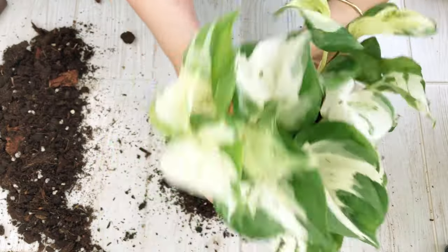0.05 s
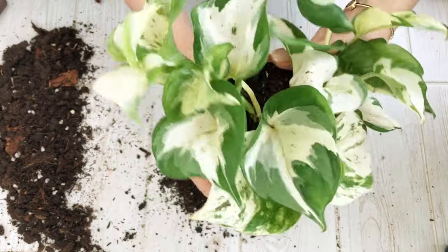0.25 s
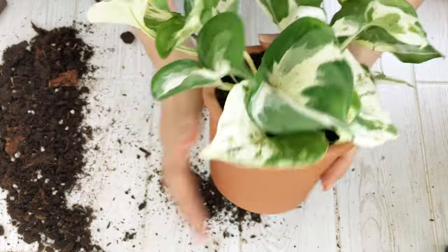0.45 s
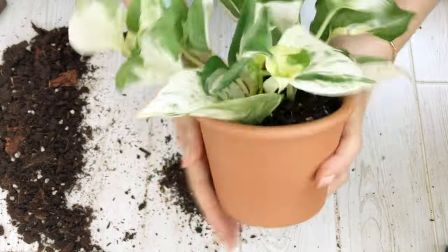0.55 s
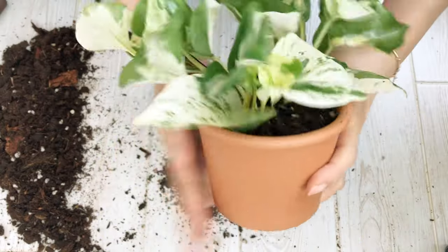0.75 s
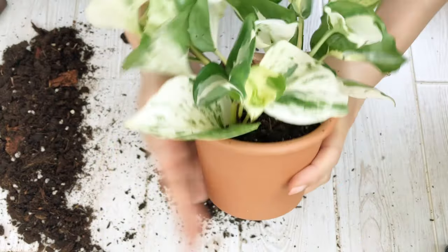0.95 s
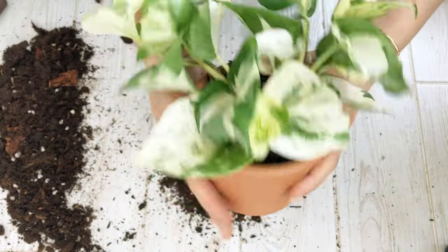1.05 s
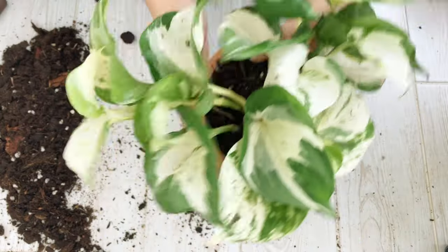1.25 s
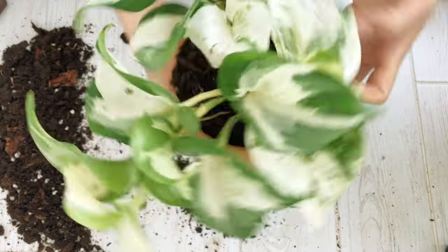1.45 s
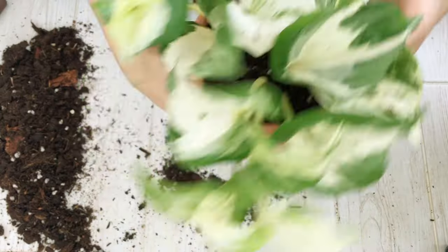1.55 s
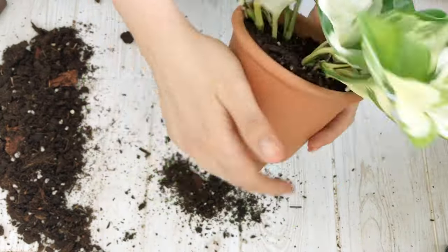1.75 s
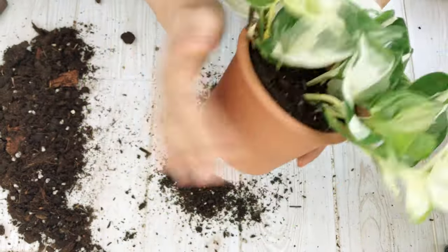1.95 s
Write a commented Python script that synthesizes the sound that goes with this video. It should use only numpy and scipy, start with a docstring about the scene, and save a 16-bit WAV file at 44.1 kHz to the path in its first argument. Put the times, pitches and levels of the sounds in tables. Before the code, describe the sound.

A hand pats a soil-filled clay plant pot in quick, gritty slaps indoors.

```python
"""A hand pats a soil-filled clay pot in a small room: six quick pats, a soft touch, then two more as
the pot is tilted. Each is a gritty slap with a short, damped ring of the clay. Before them the moving
pot gives a deep double bump; later it rumbles in the hands and the palm scrapes it once.
Leaves rustle faintly and a few thin chirps sit in the rumble, hum and hiss of the room."""
import sys
import numpy as np
from scipy import signal
from scipy.fft import rfft, irfft
from scipy.io import wavfile

SR = 44100
rng = np.random.default_rng(int(sys.argv[2]) if len(sys.argv) > 2 else 0)


def put_to_file(sound):
    """Save the sound as 16-bit audio at rate SR, in the file named by the first command-line argument."""
    columns = np.atleast_2d(sound).T  # one column per channel
    safe = np.clip(columns, -1, 1)
    whole_steps = np.round(safe * 32767)
    wavfile.write(sys.argv[1], SR, whole_steps.astype(np.int16))


N = 88200


def undb(db):
    """Decibels to gain."""
    return 10 ** (np.asarray(db) / 20)


def unit(x):
    """Scale to rms 1."""
    return x / np.sqrt(np.mean(x ** 2) + 1e-30)


def unit_energy(x):
    """Scale to energy 1."""
    return x / np.linalg.norm(x)


def clock():
    """Sample times in seconds."""
    return np.arange(N) / SR


def fade(t, t60_s):
    """Exponential decay from t = 0, silent before."""
    return (t >= 0) * np.exp(-np.log(1000) * np.maximum(t, 0) / t60_s)


def swell(middle_s, sigma_s):
    """Gaussian rise and fall."""
    return np.exp(-.5 * ((clock() - middle_s) / sigma_s) ** 2)


def colour(x, spectrum):
    """Filter by a curve of (Hz, dB) points."""
    hz, db = np.array(spectrum, float).T
    bins_hz = np.maximum(np.fft.rfftfreq(len(x), 1 / SR), 1)
    gain = undb(np.interp(np.log(bins_hz), np.log(hz), db))
    return irfft(rfft(x) * gain, len(x))


def band(x, hz, kind):
    """Causal low-, band- or high-pass."""
    return signal.sosfilt(signal.butter(3, hz, kind, fs=SR, output="sos"), x)


def noise(spectrum):
    """Coloured noise of rms 1."""
    return unit(colour(rng.standard_normal(N), spectrum))


def band_noise(hz, kind):
    """Band-limited noise of rms 1."""
    return unit(band(rng.standard_normal(N), hz, kind))


def grit(count, spread_db):
    """Dense tiny clicks of uneven size."""
    return rng.standard_normal(count) * undb(spread_db * rng.standard_normal(count))


# Room noise spectra. Each row: frequency in Hz, relative level in dB.
RUMBLE_SPECTRUM = [(12, -0.5), (25, -9.5), (38, 2.5), (55, 1.5), (70, -15.5), (88, -6), (120, -23.5),
                   (150, -15.5), (200, -22), (260, -25), (340, -35), (600, -66.5)]
HISS_SPECTRUM = [(100, 7.5), (430, 5.5), (510, 4.5), (610, 12.5), (800, 3), (1000, 1), (1450, 3),
                 (2200, -0.5), (4000, -5), (5300, -4), (8000, -6.5), (12000, -7.5), (16000, -14.5)]

def room_noise(rumble_db=-39, hiss_db=-56.5):
    """Steady low rumble and a soft hiss that wavers a little."""
    waver_db = 0.45 * band_noise(17, "low")
    return undb(rumble_db) * noise(RUMBLE_SPECTRUM) + undb(hiss_db + waver_db) * noise(HISS_SPECTRUM)


# Low tones of the room. Each row: frequency in Hz, level in dB.
HUM_TONES = [(88, -52), (117, -53), (184, -64.5), (259, -66.5)]

def room_hum(half_width_hz=3.57):
    """Narrow noise bands, heard as tones that swell and fade."""
    return sum(undb(db) * band_noise([hz - half_width_hz, hz + half_width_hz], "band")
               for hz, db in HUM_TONES)


# Hands and leaves brushing the clay. Each row: middle in seconds, sigma in seconds, level in dB.
RUSTLES = [(0.04, 0.062, -56), (0.227, 0.011, -57), (0.311, 0.041, -55.5), (0.44, 0.021, -57.5),
           (1.222, 0.019, -59.5), (1.37, 0.066, -59), (1.59, 0.028, -58), (1.65, 0.0078, -57),
           (1.73, 0.021, -54), (1.792, 0.022, -56)]
# Rustle spectrum. Each row: frequency in Hz, relative level in dB.
LEAF_SPECTRUM = [(300, 11.5), (700, 7.5), (1500, 4), (3000, 5), (5000, 2), (7000, -3), (9100, 1),
                 (11000, -8), (12900, -2), (13600, 1), (16000, 6.5)]
# Rubbed clay resonances. Each row: frequency in Hz, width in Hz, level in dB re the rub.
RUBBED_MODES = [(4870, 90, -22), (9120, 490, -12.5), (12700, 360, -11)]

def leaves():
    """Fine-grained rustle of hands and swinging plant; the rubbing sets the clay singing faintly."""
    motion = sum(undb(db) * swell(middle_s, sigma_s) for middle_s, sigma_s, db in RUSTLES)
    rub = unit(colour(grit(N, spread_db=4), LEAF_SPECTRUM))
    clay = 0
    for hz, width_hz, db in RUBBED_MODES:
        resonator = signal.iirpeak(hz, hz / width_hz, fs=SR)
        clay += undb(db) * unit(signal.lfilter(*resonator, rub))
    return motion * unit(rub + clay)


# Thin chirps. Each row: middle in seconds, sigma in seconds, pitch in Hz, level in dB,
# wobble as a share of pitch.
CHIRPS = [(0.201, 0.017, 3060, -59.5, .02), (0.386, 0.024, 3210, -63.5, .022),
          (0.435, 0.015, 3064, -58.5, .015), (0.776, .011, 3090, -61, 0.011),
          (1.123, 0.017, 3170, -65.5, 0.016), (1.325, 0.016, 2710, -61.5, 0.0061),
          (1.368, 0.012, 2450, -64, .009)]

def chirps(wobble_hz=300, flutter_hz=110, flutter_db=3):
    """Faint whistles, unsteady in pitch and level."""
    out = 0
    for middle_s, sigma_s, hz, db, wobble in CHIRPS:
        pitch_hz = hz * (1 + wobble * band_noise(wobble_hz, "low"))
        flutter = undb(flutter_db * band_noise(flutter_hz, "low"))
        whistle = np.sin(2 * np.pi * np.cumsum(pitch_hz) / SR)
        out += undb(db) * swell(middle_s, sigma_s) * unit(flutter * whistle)
    return out


# Bumps of the moving pot. Each row: start in seconds, gain in dB, rise in seconds.
BUMPS = [(0.229, 1, .016), (0.32, -6, 0.017)]
# Low modes they ring. Each row: frequency in Hz, relative level in dB, T60 in seconds.
BUMP_MODES = [(36.15, -8.5, 0.33), (50.1, -15, 0.29), (89.3, -28, 0.476), (115.9, -33.5, 0.63)]
# Shudder spectrum. Each row: frequency in Hz, relative level in dB.
SHUDDER_SPECTRUM = [(20, -9), (55, 16.5), (90, 5), (140, 2.5), (200, -13.5), (330, -18.5), (600, -50)]

def bumps(shudder_db=-30):
    """A soft, deep bump and a weaker one as the pot settles: low modes and a shudder that die away."""
    out = 0
    for start_s, bump_db, rise_s in BUMPS:
        t = np.maximum(clock() - start_s, 0)
        swing = sum(undb(db) * np.sin(2 * np.pi * hz * t) * fade(t, t60_s)
                    for hz, db, t60_s in BUMP_MODES)
        shudder = undb(shudder_db) * noise(SHUDDER_SPECTRUM) * fade(t, t60_s=0.69)
        out += undb(bump_db) * (swing + shudder) * (1 - np.exp(-t / rise_s))
    return out


def slap(t, contact_s, crack_s, crack_db):
    """Gritty hand contact with one sharp fingertip crack, at unit energy."""
    rise_s = 0.93 * contact_s
    contact = grit(len(t), spread_db=6.5) * (1 - np.exp(-t / rise_s)) * np.exp(-t / contact_s)
    crack = undb(crack_db) * signal.unit_impulse(len(t), int(crack_s * SR))
    return unit_energy(unit_energy(contact) + crack)


def ring(t, hz, t60_s):
    """One struck mode of unit energy."""
    return unit_energy(np.sin(2 * np.pi * hz * t) * fade(t, t60_s))


# Clay wall modes. Each row: frequency in Hz, relative energy in dB, T60 in seconds.
CLAY_MODES = [(730, 11.5, 0.049), (863, 3.5, 0.07), (1445, 7.5, 0.04), (1970, 7.5, 0.065), (2470, 1, 0.036),
              (3280, -11, 0.011), (4540, -13, 0.12), (5690, 9, 0.014), (5900, 3, 0.068), (7300, -8, 0.042),
              (9020, 8, 0.047), (12470, 12.5, 0.041)]

def clay_ring(t, detune=0.004):
    """The wall rings, damped by soil and hand, slightly detuned on each pat."""
    return unit_energy(sum(undb(db) * ring(t, hz * (1 + detune * rng.standard_normal()), t60_s)
                           for hz, db, t60_s in CLAY_MODES))


def echoes(t, t60_s, delay_s=0.0027):
    """Diffuse reflections of unit energy."""
    return unit_energy(rng.standard_normal(len(t)) * fade(t - delay_s, t60_s))


def wall_echoes(t, split_hz=6040):
    """Room tail; the walls absorb the treble sooner."""
    return band(echoes(t, t60_s=0.2), split_hz, "low") + band(echoes(t, t60_s=0.18), split_hz, "high")


# Hand pats. Each row: start in seconds; thud, hollow, middle and treble band levels in dB; contact decay
# in seconds; crack delay in seconds, gain in dB; then the struck spot's modes: knock in Hz, gain in dB;
# ring in Hz, gain in dB, T60 in seconds; tick in Hz, gain in dB.
PATS = [(0.5461, -64, -54.5, -54.5, -59, 0.0045, 0.0025, -24, 734, -15, 1296, -3, 0.054, 4850, -13),
        (0.642, -56.5, -48, -47, -40, 0.0014, 0.00034, -4, 784, -17, 3240, -5.5, .015, 9870, -12.5),
        (0.7360, -51, -52, -52.5, -50.5, 0.0041, 0.00054, -10, 880, -23, 1850, -10, 0.023, 12330, -15),
        (0.8285, -53.5, -47.5, -42.5, -41.5, 0.002, 0.0019, 1, 688, -15, 2520, -12.5, .02, 4130, -10),
        (0.9234, -56, -50, -52, -44, 0.0012, 0.00073, -13, 690, -18, 3380, -6.5, .016, 9040, -17),
        (1.0117, -48, -48.5, -50, -44.5, 0.0014, .0016, -11, 710, -7, 3250, -10.5, 0.012, 7750, -19),
        (1.607, -54, -60.5, -63.5, -56.5, 0.0022, 0.0012, 2, 410, -9, 1060, -9, 0.042, 9100, -23),
        (1.8986, -61, -50.5, -53, -43, 0.0017, 0.00028, -12, 667, -7, 4750, -5, 0.066, 11360, -6),
        (1.9858, -46, -49.5, -48, -41, 0.0025, 0.0018, -1, 603, -8, 4800, -10.5, .04, 9480, -5)]
# Pat colour before the band levels are set. Each row: frequency in Hz, gain in dB.
PAT_COLOUR = [(150, 8), (450, -2), (680, -1), (1100, 5), (2500, 6.5), (4200, 5.5), (7300, 8), (9300, 10),
              (11000, 7.5), (12500, 7), (15000, 8.5), (16000, 0)]

def pats(clay_db=-3.5, table_db=-5.5, walls_db=-1.5):
    """Each slap rings the clay and the struck spot, and echoes off table and walls."""
    count = SR // 2
    attack = int(0.02 * SR)  # band levels hold over the first 20 ms
    bands = [(520, "low"), ([520, 1050], "band"), ([1050, 4300], "band"), (4300, "high")]
    t, out = clock()[:count], np.zeros(N + 2 * count)
    for (start_s, *levels_db, contact_s, crack_s, crack_db,
         knock_hz, knock_db, ring_hz, ring_db, ring_t60_s, tick_hz, tick_db) in PATS:
        spot = (undb(knock_db) * ring(t, knock_hz, t60_s=0.075)
                + undb(ring_db) * ring(t, ring_hz, ring_t60_s)
                + undb(tick_db) * ring(t, tick_hz, t60_s=0.02))
        hit = slap(t, contact_s, crack_s, crack_db) + undb(clay_db) * clay_ring(t) + spot
        hit += undb(table_db) * echoes(t, t60_s=0.06) + undb(walls_db) * wall_echoes(t)
        hit = colour(np.pad(hit, (0, count)), PAT_COLOUR)[:count]
        at = int(start_s * SR)
        for (edges_hz, kind), db in zip(bands, levels_db):
            part = band(hit, edges_hz, kind)
            out[at:at + count] += undb(db) * part / np.std(part[:attack])
    return out[:N]


# Shifts of the pot. Each row: middle in seconds, sigma in seconds, level in dB.
SHIFTS = [(0.918, .05, -36), (1.345, 0.041, -38), (1.556, 0.042, -46)]
# Their spectrum. Each row: frequency in Hz, relative level in dB.
SHIFT_SPECTRUM = [(25, -1), (45, 0.5), (65, 1), (95, -2.5), (150, -17), (230, -26.5), (400, -48)]

def pot_shifts():
    """The pot rumbles dully as it shifts in the hands."""
    motion = sum(undb(db) * swell(middle_s, sigma_s) for middle_s, sigma_s, db in SHIFTS)
    return motion * noise(SHIFT_SPECTRUM)


# Spectrum of palm on clay. Each row: frequency in Hz, relative level in dB.
SCRAPE_SPECTRUM = [(500, -19), (1350, 5), (2500, 0), (4000, -10), (6000, 1), (9000, -19), (16000, -22)]

def palm_scrape(level_db=-61.5):
    """One dry scrape as the grip changes."""
    friction = unit(colour(grit(N, spread_db=4), SCRAPE_SPECTRUM))
    return undb(level_db) * swell(middle_s=1.354, sigma_s=0.051) * friction


def scene():
    """All sources summed to mono."""
    mix = pats() + bumps() + leaves() + chirps() + room_noise() + room_hum()
    return (mix + palm_scrape() + pot_shifts())[None]


def record(dry):
    """Steep low-pass on the top treble."""
    cutoff_hz = 15750
    return signal.sosfilt(signal.ellip(8, .2, 70, cutoff_hz, fs=SR, output="sos"), dry)


dry = scene()
out = record(dry)
put_to_file(out)
```